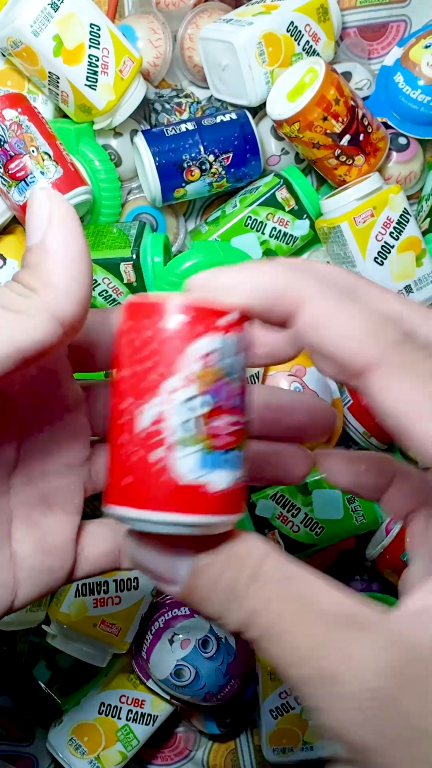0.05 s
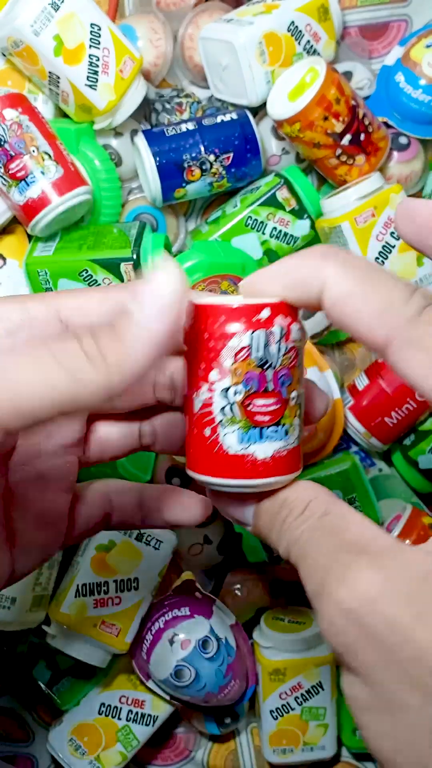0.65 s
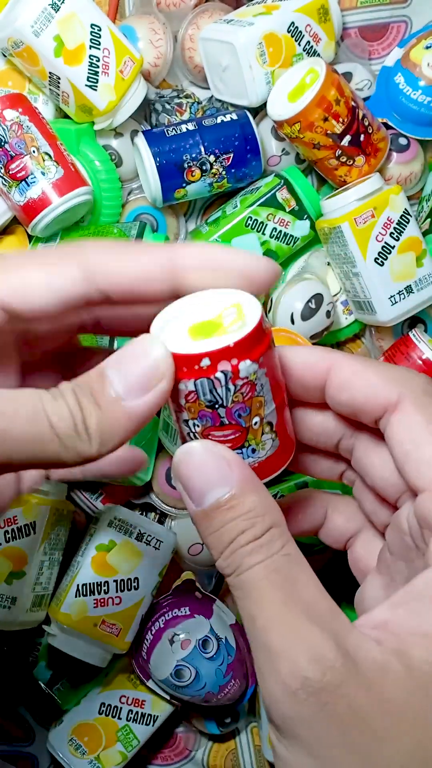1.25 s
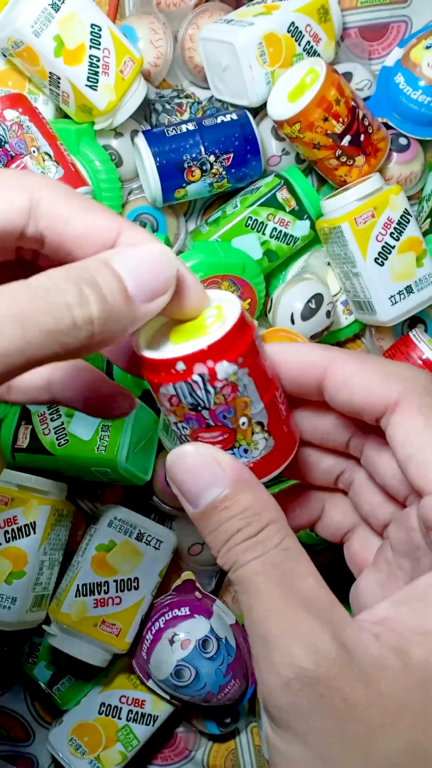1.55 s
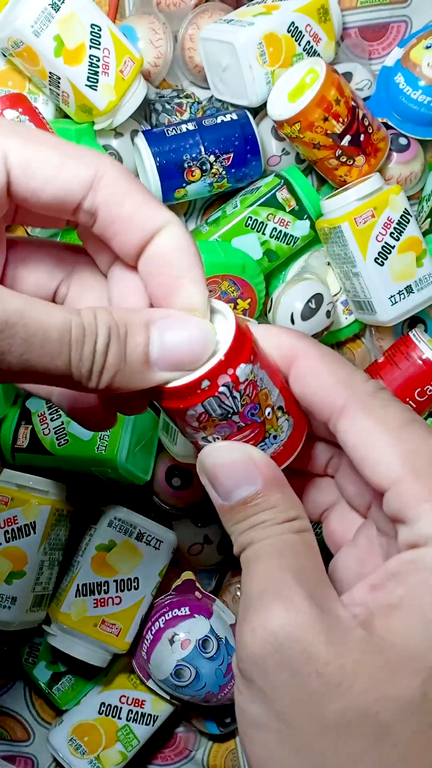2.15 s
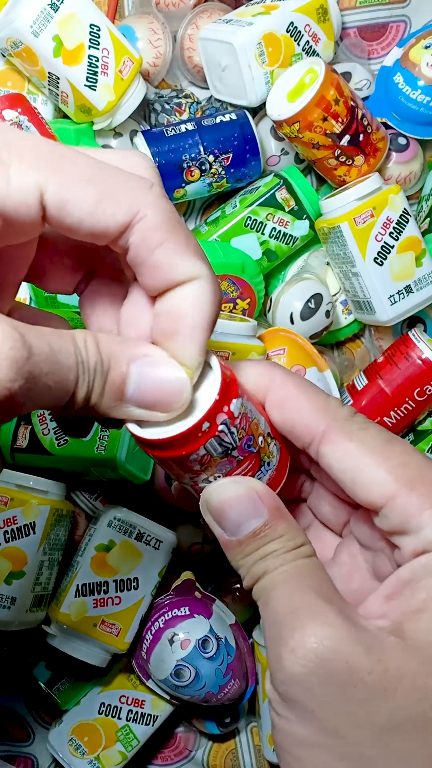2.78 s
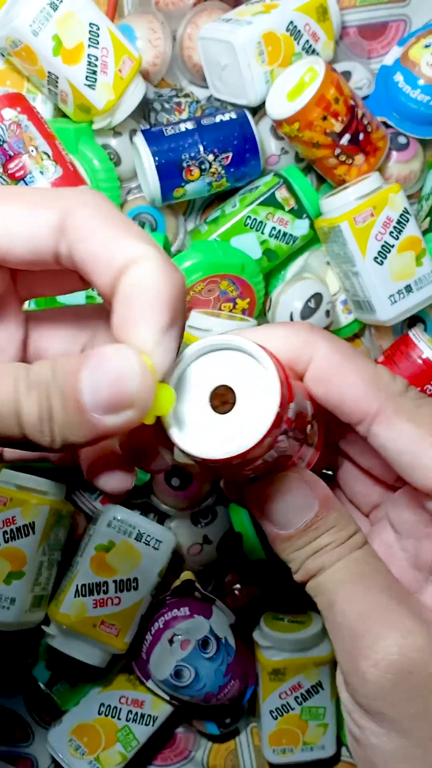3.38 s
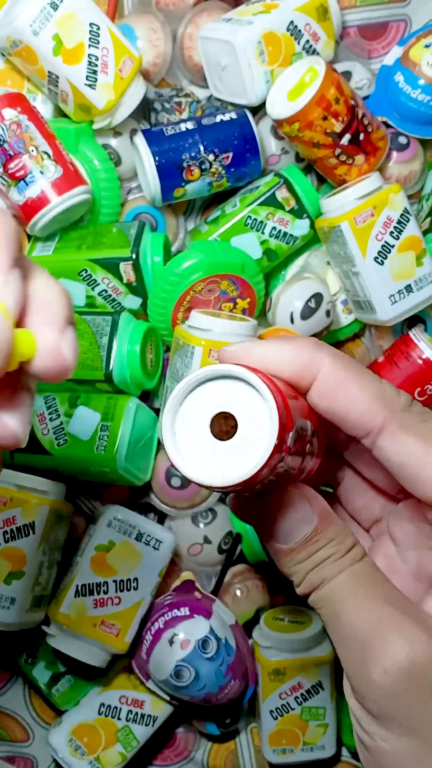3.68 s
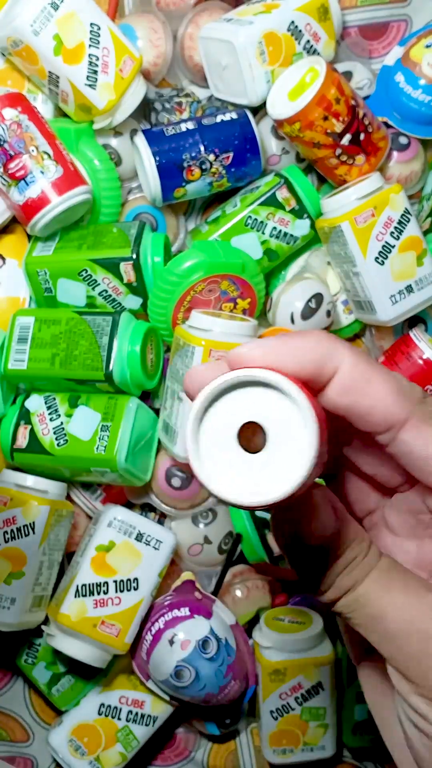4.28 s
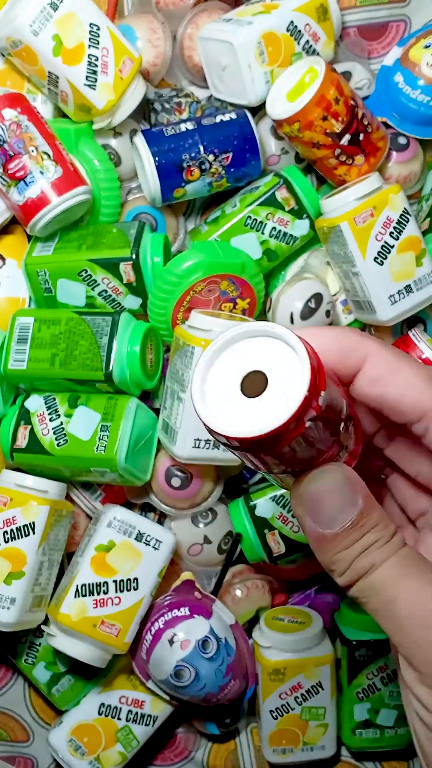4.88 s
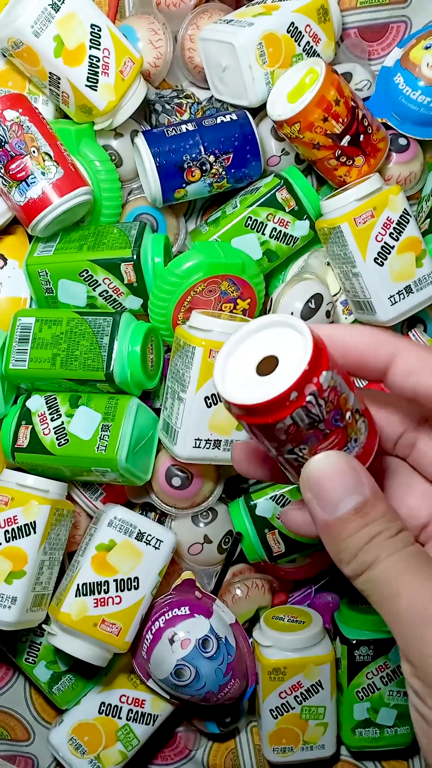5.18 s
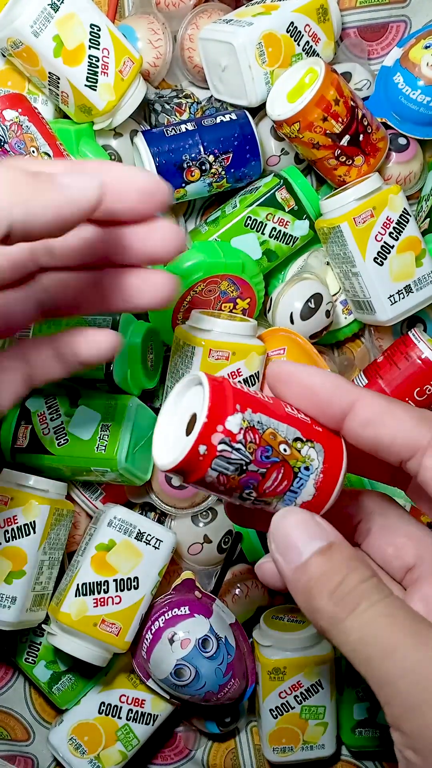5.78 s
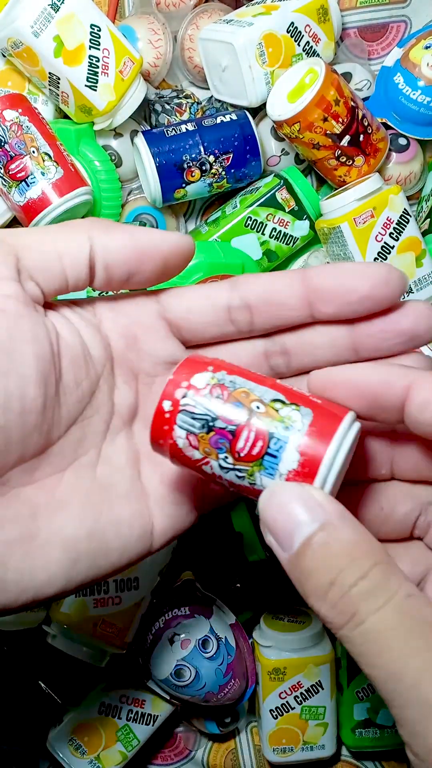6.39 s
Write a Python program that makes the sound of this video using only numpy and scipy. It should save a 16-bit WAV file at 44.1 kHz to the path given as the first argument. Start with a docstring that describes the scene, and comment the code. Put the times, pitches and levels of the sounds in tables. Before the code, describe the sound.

Tiny hard candies slide and rattle briefly as a small plastic can is turned over. Fingers rub it softly and a nail picks at the plug a few times. The plug comes out with a loud, sharp pop and a puff of air, echoing briefly. The candies rattle again in the open can, followed by light knocks and taps. It is all close to the microphones in a quiet, hard-walled room with faint ventilation.

```python
"""Opening a can of candies

Tiny hard candies slide and rattle in a small plastic can, turned over close to two microphones in a
quiet, hard-walled room with faint ventilation and far-off hums. Fingers rub the can, a nail picks at
the plug, and the plug pops out with a puff of air, ringing through the room. The open can is shaken,
now sounding through its mouth too, then knocked, rubbed and tapped by the fingers."""
import sys
import numpy as np
from scipy import signal
from scipy.fft import rfft, irfft
from scipy.io import wavfile
from scipy.ndimage import uniform_filter1d, minimum_filter1d

SR = 44100
rng = np.random.default_rng(int(sys.argv[2]) if len(sys.argv) > 2 else 0)


def output_pcm(signal):
    """Save a mono or channel-first signal as 16-bit PCM at the path in sys.argv[1].

    Samples are clipped to [-1, 1] before scaling.
    """
    pcm = np.clip(np.atleast_2d(signal).T, -1, 1) * 32767
    wavfile.write(sys.argv[1], SR, np.round(pcm).astype(np.int16))


N = 288414
CLICK_SAMPLES = 2048
CLICK_HZ = np.fft.rfftfreq(CLICK_SAMPLES, 1 / SR)

# the tone of the ventilation: f/Hz, relative level/dB
VENT_TONE = [(20, -33), (45, -15.5), (90, -5.5), (190, -8), (260, -10.5), (400, -10.5), (650, -8.5),
             (1100, -10), (1500, -13.5), (2550, -12), (3300, -22.5), (5200, -26.5), (7300, -36),
             (15500, -38)]
# how alike its left and right sides are: f/Hz, likeness (1 = the same)
VENT_LIKENESS = [(60, 0.96), (130, 0.87), (290, 0.73), (640, 0.39), (1400, 0), (15000, 0.023)]
# far-off hums: start/s, end/s, f/Hz, width/Hz, level/dB
FAR_HUMS = [(-.2, 1.55, 415, 22, -68.5), (-.2, 1.2, 660, 20, -70), (1.55, 3.05, 138, 4.9, -64),
            (1.6, 6.8, 169.7, 28, -67), (5, 5.85, 121, 46, -60), (5.7, 6.8, 104, 56, -64.5)]
# the heap of candies slides and lands on the wall: t/s, level/dB, swell/s
HEAP_LANDINGS = [(0.169, -30.5, .012), (0.195, -27, 0.0011), (0.209, -19, 0.0053), (.264, -26, 0.0033),
                 (.312, -20, .0015), (0.385, -39, 0.019), (.419, -32.5, 0.016), (.506, -34.5, 0.01),
                 (.590, -47, 0.0088), (4.089, -56.5, 0.0076), (4.132, -34.5, 0.0061),
                 (4.1455, -22.5, 0.004), (4.154, -28, 0.00082), (4.218, -44, 0.015), (4.308, -39.5, 0.0034),
                 (4.411, -36, 0.0061), (4.509, -47.5, 0.0072), (4.828, -36.5, 0.0019), (4.839, -33, 0.002)]
# one candy strikes the can: t/s, level/dB, brightness/(dB per octave)
CANDY_HITS = [(.2108, 3, 3.5), (0.302, -5, 6), (0.345, -12.5, 3), (0.363, -14, 3), (0.462, -18.5, -0.5),
              (3.332, -22.5, -2), (3.454, -25.5, -2), (3.457, -22, 2.5), (3.5479, -11.5, -4),
              (3.590, -25, -2.5), (3.614, -26, -1.5), (3.657, -27, -2.5), (3.717, -34, -2),
              (4.1459, -7.5, -2.5), (4.2174, -16, -2), (4.24, -25, -4), (4.434, -31, -4)]
# the tone of the closed can when struck: f/Hz, relative level/dB
WALL_TONE = [(100, -42.5), (600, -24.5), (1000, -21), (1500, -21), (2000, -5.5), (2450, 1), (2850, -0.5),
             (3350, -10), (4300, -4), (5200, 2), (6100, -1.5), (7200, -7), (9800, -15), (12300, -8),
             (13600, -4.5), (15500, -4.5)]
# notes of the air in the open mouth: f/Hz, relative level/dB, time to fade 60 dB/s
MOUTH_NOTES = [(750, -14, 0.09), (2252, -15, 0.0066), (3472, 10.5, 0.018), (3850, 14, 0.02),
               (4020, 12.5, 0.018), (4790, 9.5, 0.022), (5200, 11.5, 0.014)]
# skin drags over the wall: t/s at the firmest, level/dB, length/s, brightness/(dB per octave)
SKIN_RUBS = [(0.897, -52, 0.052, -5), (.955, -48.5, 0.021, -1), (1.21, -59, 0.094, -3),
             (1.825, -57, .02, -4.5), (5.898, -56.5, 0.051, -7.5), (6.163, -61.5, 0.054, -2),
             (6.302, -55, 0.044, 0.5), (6.408, -57, 0.066, 0), (6.485, -60, .1, -3)]
# a nail picks at the plug: t/s, level/dB, brightness/(dB per octave)
NAIL_PICKS = [(1.4188, -19.5, -9), (1.815, -20.5, -1.5), (2.844, -19.5, -2)]
# the tone of the plug's snapping edge: f/Hz, relative level/dB
SNAP_TONE = [(100, -26.5), (700, -15), (1500, -10.5), (2100, 1), (2900, -2), (4200, -1.5), (5100, 3),
             (6000, 0.5), (7200, -15.5), (9000, -12.5), (15500, -24.5)]
# the plug lets go in quick slips: t/s, level/dB
PLUG_SLIPS = [(3.0800, 19), (3.0811, 14.5), (3.0825, 19)]
# notes of the freed rim: f/Hz, relative level/dB, time to fade 60 dB/s
RIM_NOTES = [(2308, -8.5, 0.017), (2730, 2, 0.015), (2870, 10.5, 0.021), (3830, -12, 0.0055),
             (4700, 14, 0.013)]
# the tone of the escaping air: f/Hz, relative level/dB
PUFF_TONE = [(20, -20), (70, -3), (130, -1), (300, -3), (700, -5), (1100, -5.5), (1600, -21), (4000, -40),
             (16000, -60)]
# the tone of the pop as it spreads toward the room's walls: f/Hz, relative level/dB
SPREAD_TONE = [(100, -19), (700, -10), (1500, -12.5), (2100, 1), (2900, 9.5), (3600, 2.5), (5000, 2),
               (5600, -3.5), (6200, -6), (7300, -16.5), (9000, -15.5), (15500, -29.5)]
# a fingertip knocks on the can: t/s, level/dB, strength of the base's ring
FINGER_KNOCKS = [(5.308, -23, .05), (5.3467, -14.5, 0.22), (5.355, -14, 1.1)]
# the tone of the can under a soft fingertip: f/Hz, relative level/dB
THUD_TONE = [(100, -27), (600, -6.5), (1100, -3), (1800, -8), (2600, 6), (3400, 0.5), (4500, -5.5),
             (6500, -15.5), (9000, -32), (15500, -27)]
# notes of the can's base: f/Hz, relative level/dB, time to fade 60 dB/s
BASE_NOTES = [(834, -28, 0.11), (1082, 2, 0.11), (1130, 10, 0.028), (1610, 1, 0.028), (2640, -9, 0.068)]
# the can brushes the fingers: t/s, level/dB
FINGER_TAPS = [(6.012, -28), (6.0262, -12.5), (6.042, -25.5), (6.440, -25.5), (6.4752, -22), (6.502, -26.5)]
# how long the room rings: f/Hz, time to fade 60 dB/s
ECHO_FADE = [(150, 0.13), (700, 0.42), (1500, 0.51), (2900, 0.808), (5000, 0.67), (7000, 0.58),
             (14000, 0.36)]
# how strongly the room rings: f/Hz, level/dB
ECHO_LEVEL = [(100, -41.5), (600, -14.5), (1400, -8.5), (2200, -9.5), (2900, -11), (4000, -12.5),
              (6000, -11), (7500, -18), (14000, -14)]

OPEN_S, POP_S = PLUG_SLIPS[0][0], PLUG_SLIPS[1][0]


def amp(db):
    """Turns decibels into a number to multiply by."""
    return 10 ** (np.asarray(db) / 20)


def unit(x):
    """Scales a sound to an average energy of one per channel."""
    return x / np.sqrt(np.mean(np.sum(x ** 2, -1)) + 1e-20)


def read(table, hz):
    """Reads between a table's rows, with octaves evenly spaced."""
    row_hz, value = np.transpose(table)
    return np.interp(np.log(hz + 1), np.log(row_hz), value)


def add(mix, s, sound):
    """Mixes a sound in at s seconds."""
    part = mix[:, max(round(s * SR), 0):][:, :sound.shape[1]]
    part += sound[:, :part.shape[1]]


def click(tone_db):
    """The quickest-dying click that has this tone."""
    cepstrum = irfft(np.log(amp(tone_db)))
    # folding the late half onto the early half packs the energy at the start
    cepstrum[..., 1:CLICK_SAMPLES // 2] *= 2
    cepstrum[..., CLICK_SAMPLES // 2 + 1:] = 0
    return unit(irfft(np.exp(rfft(cepstrum))))


def contact(tone, tilt=0, clatter_s=0.0034, direct=0.42, apart_hz=3500):
    """A click bounces about in the can and throws its treble differently to each side."""
    t = np.arange(CLICK_SAMPLES) / SR
    clatter = rfft(unit(rng.standard_normal((3, CLICK_SAMPLES)) * np.exp(-t / clatter_s)))
    apart = CLICK_HZ ** 2 / (CLICK_HZ ** 2 + apart_hz ** 2)
    paths = direct + np.sqrt(1 - apart) * clatter[2] + np.sqrt(apart) * clatter[:2]
    octaves = np.log2(np.maximum(CLICK_HZ, 900) / 4000)
    strike = click(read(tone, CLICK_HZ) + tilt * octaves)  # more tilt is brighter
    return unit(irfft(paths * rfft(strike)))


def ring(notes, detune=0):
    """A struck part rings with fading notes; detune shifts them a little, as grip and aim vary."""
    t = np.arange(CLICK_SAMPLES) / SR
    shifts = 1 + detune * rng.standard_normal(len(notes))
    sound = np.zeros(CLICK_SAMPLES)
    for (hz, db, fade_s), shift in zip(notes, shifts):
        note = amp(db - 60 * t / fade_s) * np.sin(2 * np.pi * hz * shift * t)
        # a small body gives off little below its note
        bass_cut = signal.butter(4, hz / np.sqrt(2), "high", fs=SR)
        sound += signal.lfilter(*bass_cut, note)
    return unit(sound)


def arrive(sound, lag_s=8.5e-5):
    """The can is nearer the right microphone, so its sound reaches the left one later."""
    fade = np.minimum(np.linspace(2, 0, CLICK_SAMPLES), 1) ** 2
    delay = np.exp(-2j * np.pi * CLICK_HZ * np.array([[lag_s], [0]]))
    return fade * irfft(rfft(sound) * delay)


def wall_hit(tilt, mouth=0):
    """One hit on the can's wall, which may also ring the air in its mouth."""
    wall = arrive(contact(WALL_TONE, tilt))
    # the mouth faces the microphones more squarely, so it lags less
    return wall + mouth * arrive(ring(MOUTH_NOTES, detune=0.022), lag_s=4e-5)


def swarm(rows, envelope, per_s, scatter_db, tilt, mouth=0, spots=14):
    """Bursts of tiny random hits on several spots of the wall, each burst shaped by the envelope."""
    spot_sounds = [wall_hit(tilt, mouth) for _ in range(spots)]
    out = np.zeros((2, N))
    t = np.arange(-SR // 8, SR // 3) / SR
    for s, db, span_s in rows:
        shape = envelope(t, db, span_s)
        hit = (rng.random(len(t)) < per_s / SR) | (t == 0)
        size = amp(scatter_db * np.clip(rng.standard_normal(len(t)), -2, 2))
        force = size * rng.choice([-1, 1], len(t)) * shape
        spot = rng.integers(0, spots, len(t))
        burst = np.zeros((2, len(t)))
        for i in np.flatnonzero(hit & (shape > .01)):
            add(burst, i / SR, force[i] * spot_sounds[spot[i]])
        add(out, s + t[0], amp(db) * np.linalg.norm(shape) * unit(burst))
    return out


def ventilation(level_db=-56):
    """A steady rush of air, alike on both sides in the bass."""
    hz = np.fft.rfftfreq(N, 1 / SR)
    left, other = rfft(rng.standard_normal((2, N)))
    likeness = np.clip(read(VENT_LIKENESS, hz), -1, 1)
    right = likeness * left + np.sqrt(1 - likeness ** 2) * other
    rush = irfft(np.array([left, right]) * amp(read(VENT_TONE, hz)), N)
    return amp(level_db) * np.sqrt(N) * unit(rush)


def hums(fade_s=0.18):
    """Far-off hums: narrow, wavering bands of noise that come and go."""
    hz, t = np.fft.rfftfreq(N, 1 / SR), np.arange(N) / SR
    out = np.zeros(N)
    for start, end, centre_hz, width_hz, db in FAR_HUMS:
        band = irfft(rfft(rng.standard_normal(N)) / (1 + ((hz - centre_hz) / width_hz) ** 2), N)
        fade = np.clip(np.minimum(t - start, end - t) / fade_s, 0, 1)
        out += amp(db) * np.sqrt(N) * unit(band) * fade
    return out


def landing(t, db, swell_s):
    """Loudness over time as the heap gathers, lands and settles, and a few candies bounce on."""
    gather = np.exp(-.5 * (t / swell_s) ** 2)
    settle_s = 0.011 * 2 ** ((-28 - db) / 18)  # a softer landing takes longer to settle
    settle = np.exp(-abs(t) / settle_s)
    stragglers = amp(-33) * np.exp(-abs(t) / 0.1)
    return np.where(t < 0, gather, np.maximum(settle, stragglers))


def candies(open_boost_db=3):
    """Candies hit the wall in heaps and singly; once the plug is out, the mouth rings too."""
    before = [row for row in HEAP_LANDINGS if row[0] < OPEN_S]
    after = [row for row in HEAP_LANDINGS if row[0] > OPEN_S]
    closed = swarm(before, landing, per_s=1700, scatter_db=5, tilt=0)
    opened = swarm(after, landing, per_s=1700, scatter_db=5, tilt=-0.88, mouth=1.28)
    out = closed + amp(open_boost_db) * opened
    for s, db, tilt in CANDY_HITS:
        add(out, s, amp(db) * wall_hit(tilt, mouth=1.84 if s > OPEN_S else 0))
    return out


def room_echo(sound, build_s=0.0013):
    """Hard walls return a wash of echoes; each pitch dies away at its own speed."""
    hz, t, noise = signal.stft(rng.standard_normal((2, SR)), SR, nperseg=256)
    fade_rate = np.log(1000) / read(ECHO_FADE, hz)[:, None]
    level = amp(read(ECHO_LEVEL, hz))[:, None] * np.sqrt(2 * fade_rate / SR)
    tail = signal.istft(noise * level * np.exp(-fade_rate * t), SR, nperseg=256)[1]
    tail *= 1 - np.exp(-np.arange(tail.shape[1]) / SR / build_s)
    return signal.fftconvolve(sound, tail, axes=1)[:, :N]


def stroke(t, _db, length_s):
    """Loudness over time as a finger presses, slides and lets go."""
    swell_s, fade_s = 0.48 * length_s, 0.71 * length_s
    return np.exp(np.where(t < 0, -.5 * (t / swell_s) ** 2, -t / fade_s))


def rubs():
    """Skin sticks and slips on the plastic in many tiny jerks."""
    return sum(swarm([(s, db, length_s)], stroke, per_s=450, scatter_db=4.5, tilt=tilt, spots=5)
               for s, db, length_s, tilt in SKIN_RUBS)


def picks():
    """A fingernail snaps the edge of the plug."""
    out = np.zeros((2, N))
    for s, db, tilt in NAIL_PICKS:
        add(out, s, amp(db) * arrive(contact(SNAP_TONE, tilt)))
    return out


def pop(rim_db=21):
    """The plug snaps past the rim, which rings as it comes free."""
    out = np.zeros((2, N))
    for s, db in PLUG_SLIPS:
        snap = contact(SNAP_TONE, clatter_s=0.00041, direct=0.58, apart_hz=2185)
        add(out, s, amp(db) * arrive(snap))
    add(out, POP_S, amp(rim_db) * arrive(ring(RIM_NOTES)))
    return out


def puff(left_db=8, right_db=24):
    """The air let out by the plug blows mostly on the right microphone."""
    out = np.zeros((2, N))
    fade = np.cos(np.linspace(0, np.pi / 2, CLICK_SAMPLES)) ** 2
    add(out, OPEN_S, amp([[left_db], [right_db]]) * fade * click(read(PUFF_TONE, CLICK_HZ)))
    return out


def pop_spread(level_db=26.5):
    """The part of the pop that spreads out and sets the room ringing."""
    out = np.zeros((2, N))
    add(out, POP_S, amp(level_db) * click(read(SPREAD_TONE, CLICK_HZ))[None])
    return out


def knocks():
    """A soft fingertip thuds on the can and rings its base."""
    out = np.zeros((2, N))
    for s, db, base in FINGER_KNOCKS:
        thud = contact(THUD_TONE, clatter_s=0.0067)
        add(out, s, amp(db) * arrive(thud + base * ring(BASE_NOTES)))
    return out


def taps():
    """The can's wall brushes the fingers with bright taps."""
    out = np.zeros((2, N))
    for s, db in FINGER_TAPS:
        add(out, s, amp(db) * wall_hit(tilt=0.4))
    return out


def scene():
    """The can close by, its echo, and the room's quiet background."""
    can = candies() + rubs() + taps() + knocks() + picks()
    return can + pop() + puff() + room_echo(can + pop_spread()) + ventilation() + hums()


def record(dry, limit_db=-2, deepest_db=10, recover_db_per_s=130, ahead_s=.014, ceiling=0.83):
    """A limiter turns the level down around the pop, whose tip still clips; the top treble is cut."""
    peak_db = 20 * np.log10(abs(dry).max(0) + 1e-9)
    over_db = np.clip(peak_db - limit_db, 0, deepest_db)
    recovery_db = np.arange(N) / SR * recover_db_per_s
    held_db = np.maximum.accumulate(over_db + recovery_db) - recovery_db
    ahead = round(ahead_s * SR)
    coming_db = np.roll(-minimum_filter1d(-held_db, 2 * ahead), -ahead)  # the deepest dip just ahead
    dip_db = uniform_filter1d(np.maximum(held_db, coming_db), ahead)
    limited = np.clip(dry * amp(-dip_db), -ceiling, ceiling)
    treble_cut = signal.firwin(127, 15750, window=("kaiser", 8), fs=SR)
    return signal.oaconvolve(limited, treble_cut[None], "same")


dry = scene()
out = record(dry)
output_pcm(out)
```